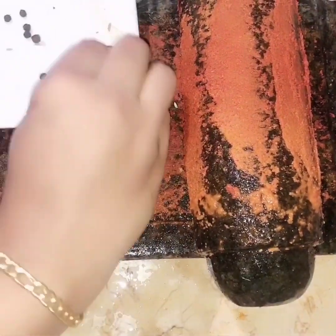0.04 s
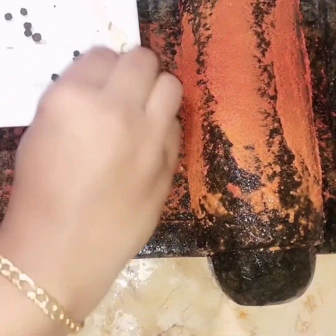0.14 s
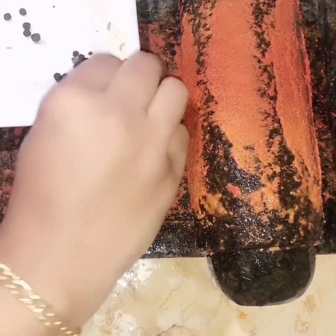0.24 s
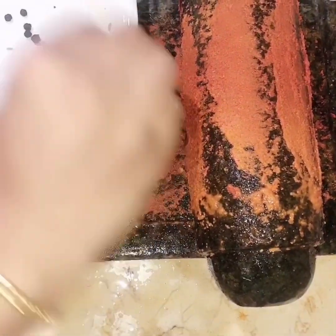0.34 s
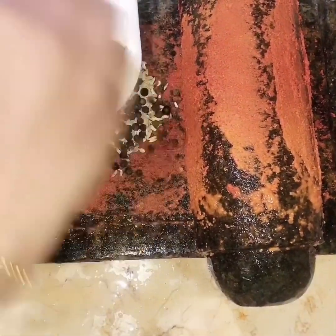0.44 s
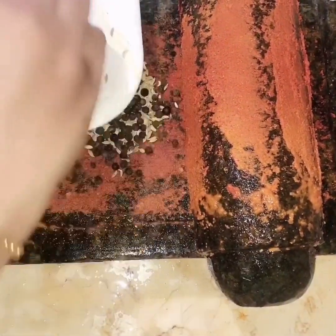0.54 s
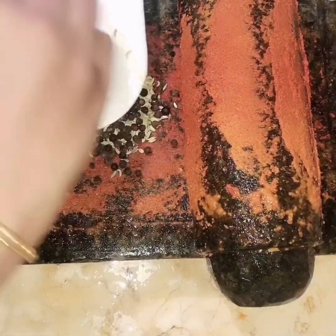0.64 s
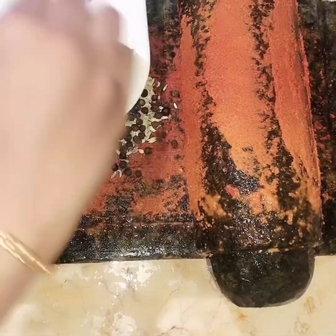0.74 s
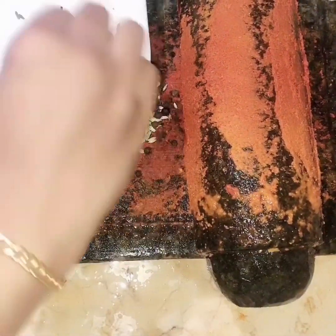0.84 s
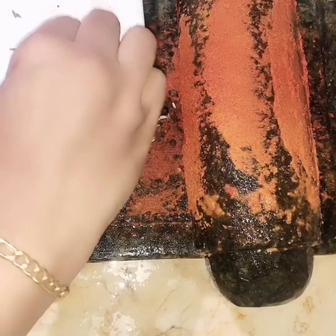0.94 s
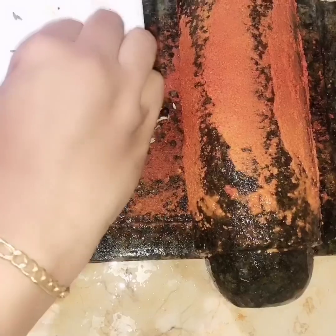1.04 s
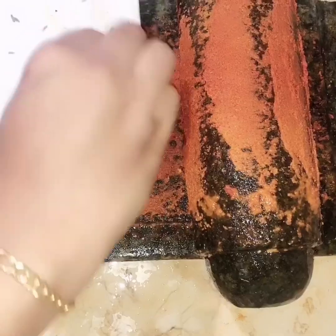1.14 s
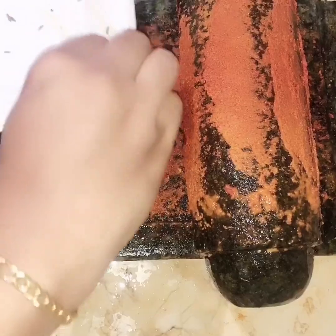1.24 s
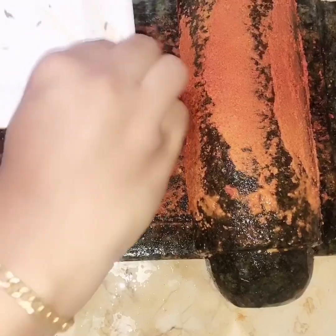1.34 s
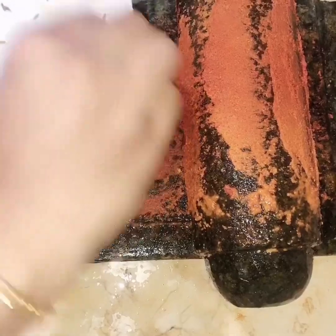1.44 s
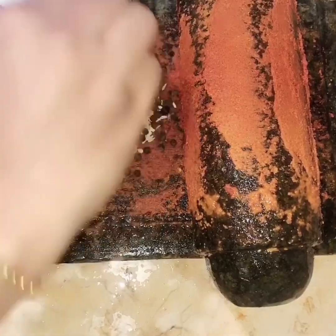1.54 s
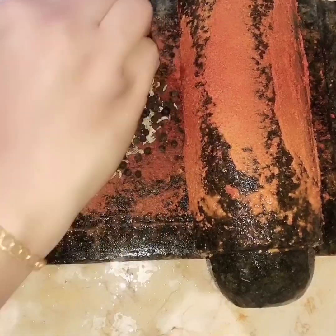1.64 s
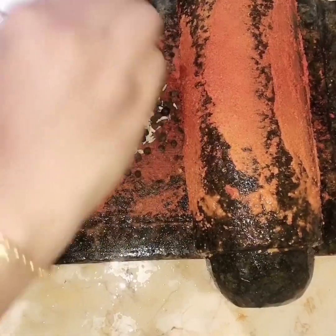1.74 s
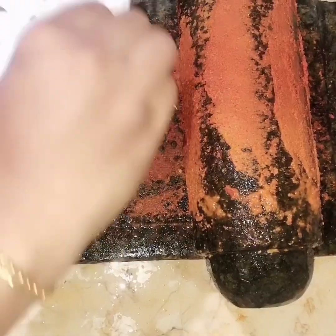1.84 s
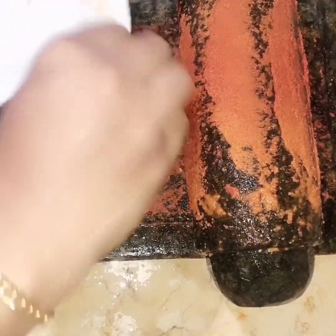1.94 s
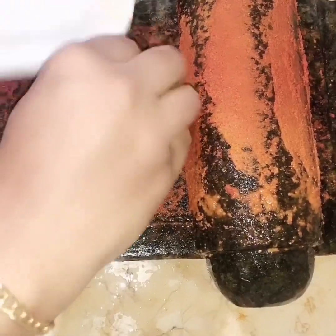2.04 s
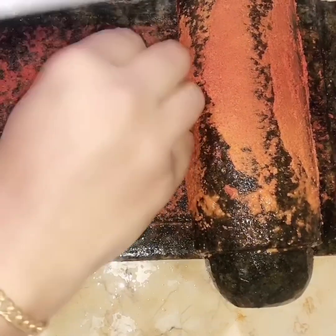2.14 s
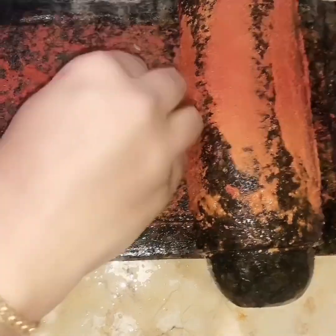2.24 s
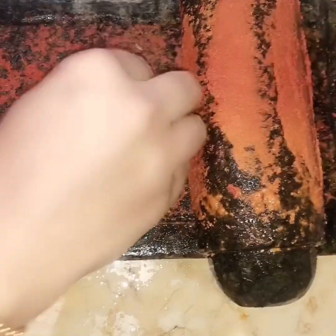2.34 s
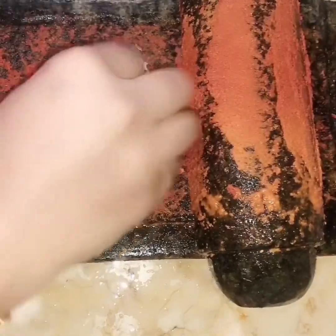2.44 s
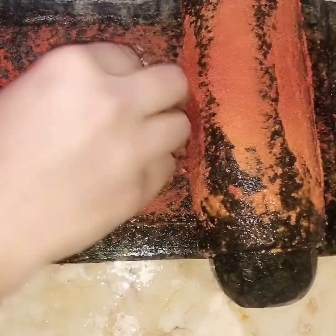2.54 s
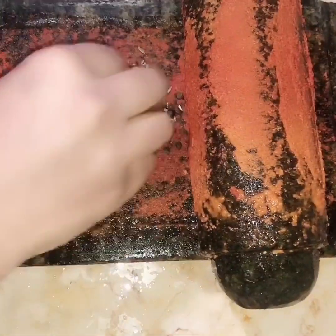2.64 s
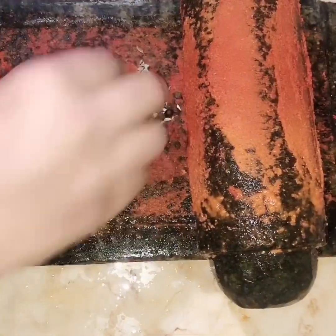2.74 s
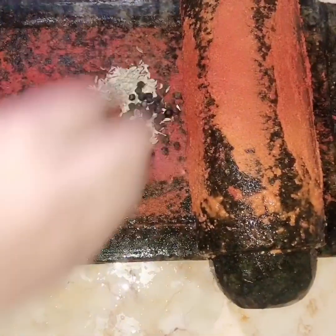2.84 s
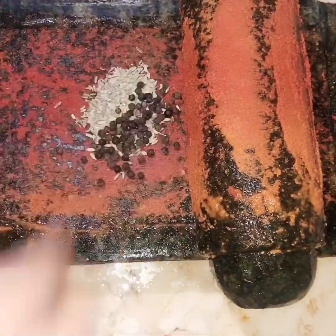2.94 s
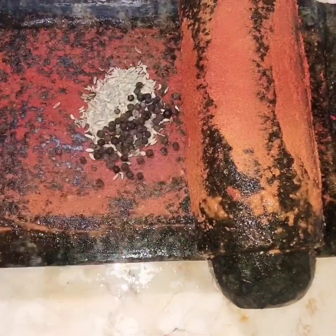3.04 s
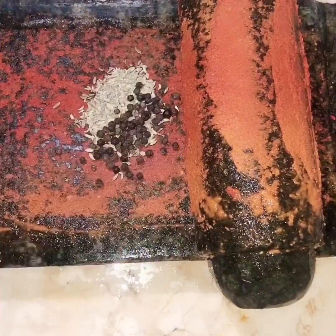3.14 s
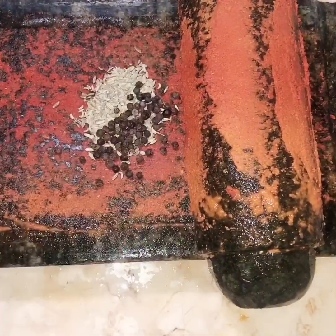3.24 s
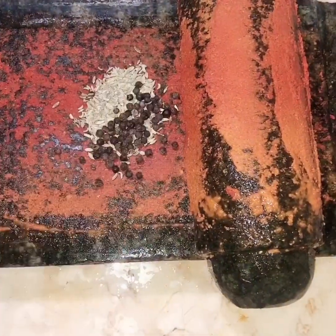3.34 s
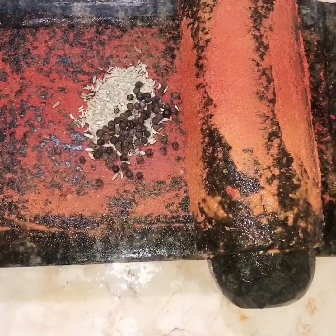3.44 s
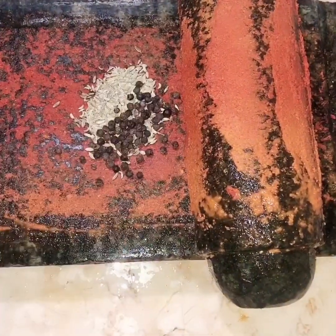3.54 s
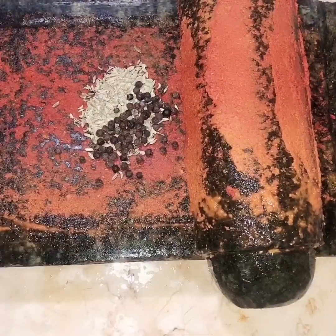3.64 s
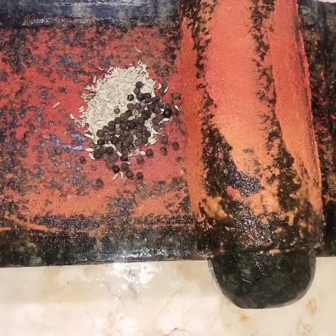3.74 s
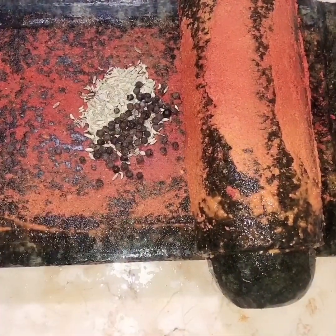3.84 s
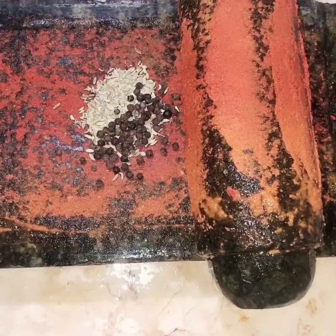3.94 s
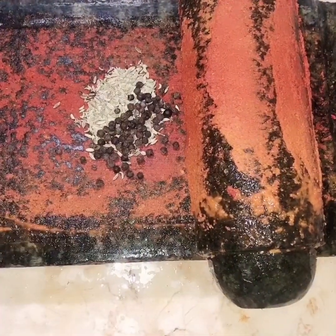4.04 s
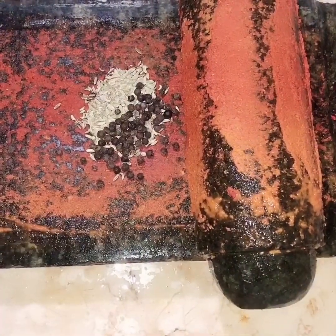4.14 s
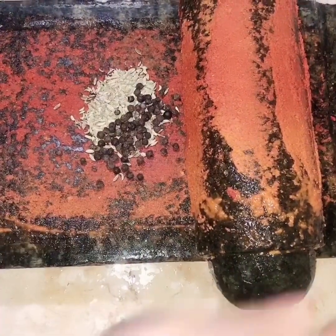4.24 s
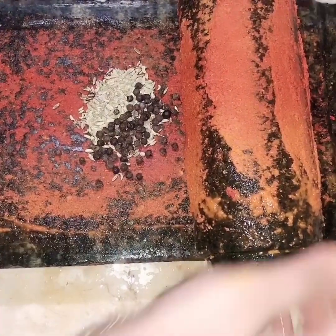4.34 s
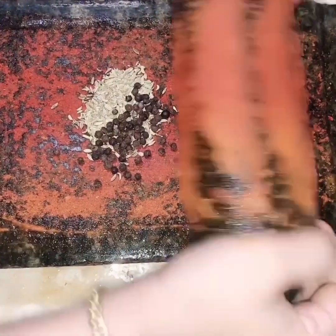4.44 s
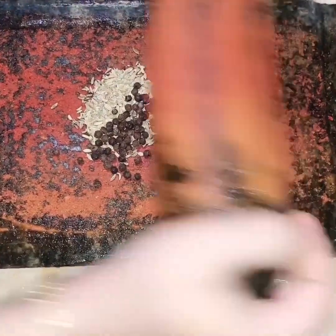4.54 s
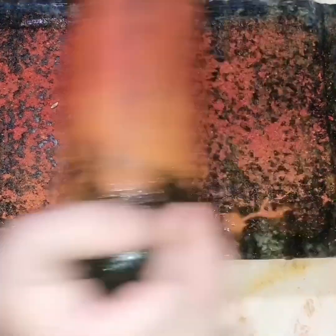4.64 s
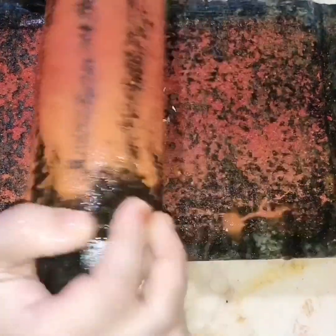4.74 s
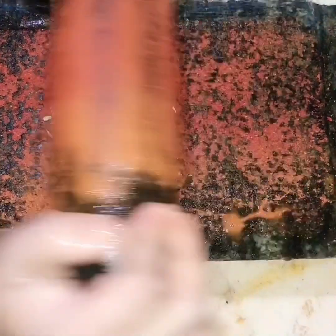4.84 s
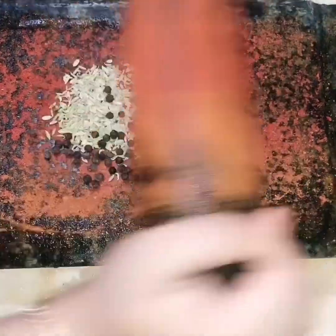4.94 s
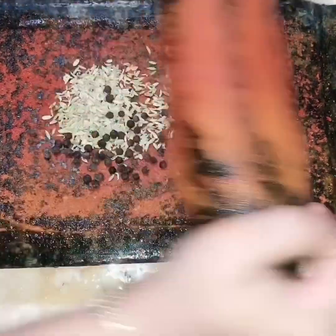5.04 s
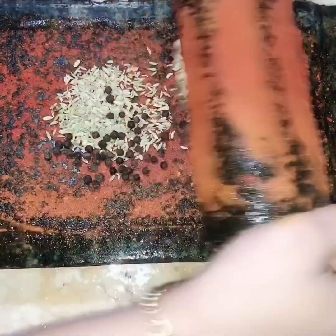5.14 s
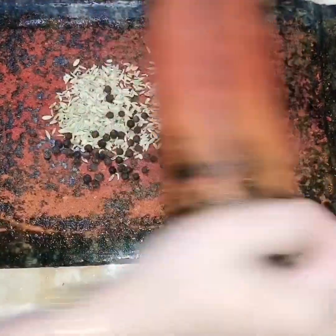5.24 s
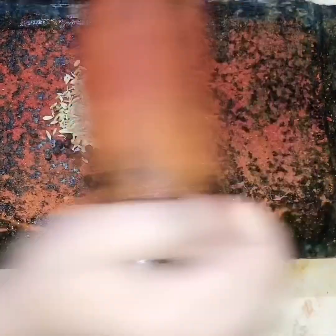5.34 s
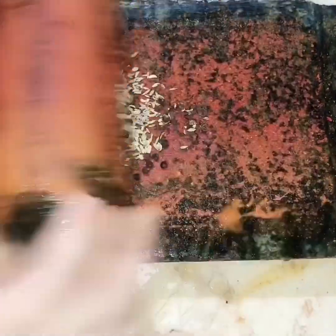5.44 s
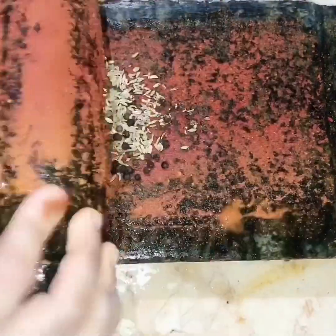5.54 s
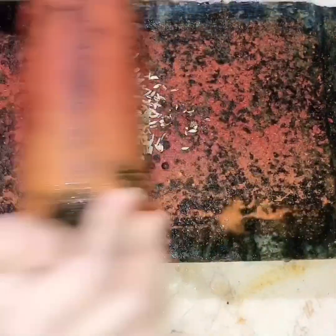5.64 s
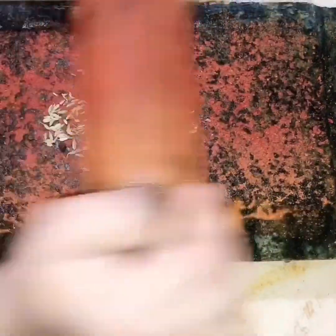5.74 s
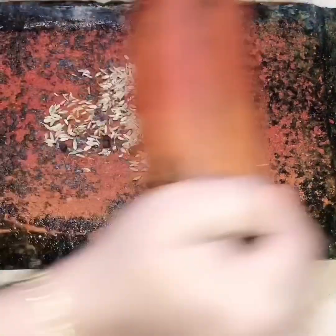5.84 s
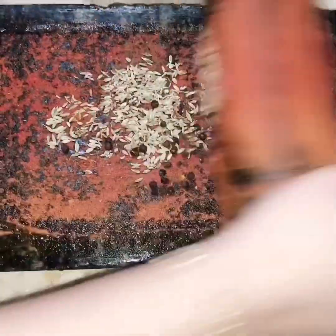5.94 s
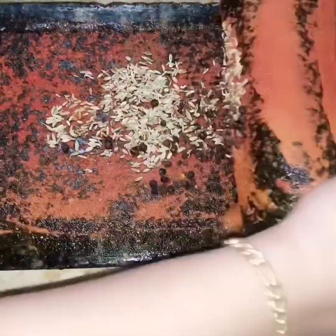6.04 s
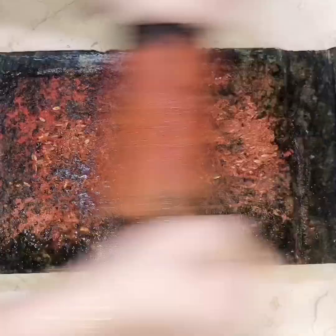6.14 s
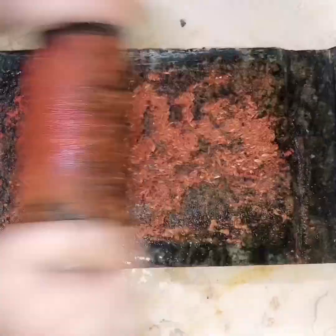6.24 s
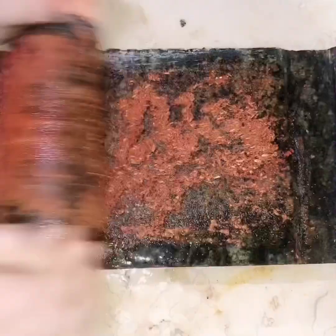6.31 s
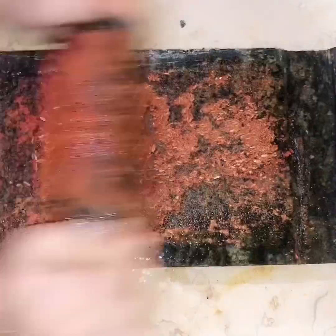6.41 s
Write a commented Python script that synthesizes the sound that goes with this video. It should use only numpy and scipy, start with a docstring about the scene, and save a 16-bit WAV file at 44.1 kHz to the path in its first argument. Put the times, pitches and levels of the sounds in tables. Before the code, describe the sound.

After a faint trickle of seeds and a ringing plate, a heavy stone roller scrapes, thumps and cracks spices in a small kitchen.

```python
"""In a small kitchen, peppercorns and fennel seeds are brushed off a plate onto a flat grinding stone.
The plate is put down, rings and rattles to rest. Then a stone roller is pushed to and fro: it grates,
knocks on the slab, thumps the counter and cracks the seeds, while a bracelet jingles faintly.
Blows are made of fading tones and noise; trickling and grinding are made of many tiny clicks.
A low rush lies under it all, and the sound drops out for a moment near the end."""
import sys
import numpy as np
from scipy import signal
from scipy.fft import rfft, irfft
from scipy.io import wavfile
from scipy.ndimage import uniform_filter1d, minimum_filter1d

SR = 44100
rng = np.random.default_rng(int(sys.argv[2]) if len(sys.argv) > 2 else 0)


def wav_record(signal):
    """Record a signal, one row per channel, as 16-bit PCM in the file named by sys.argv[1]."""
    frames = np.transpose(np.atleast_2d(signal))
    bounded = np.clip(frames, -1, 1)
    # unit amplitude maps onto the largest positive 16-bit level
    quanta = np.round(bounded * 32767).astype(np.int16)
    wavfile.write(sys.argv[1], SR, quanta)


N = 285629
TIME = np.arange(N) / SR
SHORT = TIME[:SR // 2]  # half a second, for one blow or echo

# Levels in the tables are relative. A fade_s is the time to fall by 60 dB.
# The tone of the background rush: pitch_hz, level_db
AIR_COLOUR = [(25, -8.5), (50, -5), (90, 2.3), (130, 1), (180, -4), (230, -9), (450, -17.5), (700, -15.5),
              (1100, -20.5), (2000, -25.5), (3000, -32), (4200, -41.5), (10000, -48.5), (14000, -60)]
# How long the room echoes: pitch_hz, fade_s
ROOM_FADES = [(100, 0.57), (500, 0.43), (1500, 0.43), (4000, 0.5), (9000, 0.43), (15000, 0.34)]
# Shelves and steel utensils that ring along: pitch_hz, level_db, fade_s
UTENSIL_TONES = [(300.2, 0, 0.7), (412, 2, 0.57), (478, -1.5, 0.3), (524, 4, .45), (947, 2, 0.3),
                 (920, -5.5, .35), (1100, -10, .35), (1662, -6, .4), (1950, -18.5, 0.26),
                 (2530, -0.5, 0.26), (2660, -1.5, 0.5), (2700, -3, .4), (3540, 0, .45)]
# The bracelet shakes: start_s, level_db
JINGLES = [(3.93, -50), (3.97, -46), (4.00, -58), (4.15, -50), (4.19, -64), (4.30, -44), (4.40, -64.5),
           (4.51, -41), (5.89, -35), (6.17, -37)]
# The ring of its links: pitch_hz, level_db, fade_s
LINK_TONES = [(6170, -6, 0.1), (9160, 4.5, .07), (12600, 1.5, .09)]

# Fingers sweep seeds off the plate: start_s, length_s, level_db
SWEEPS = [(0.0, 0.026, -51), (0.093, 0.089, -57), (.21, 0.067, -61), (.48, 0.19, -55.5),
          (0.693, 0.051, -50.5), (0.847, 0.21, -50.5), (1.065, 0.087, -64), (1.477, 0.0095, -49),
          (1.593, 0.044, -62), (2.206, .19, -64), (2.394, 0.21, -59), (2.68, 0.18, -69)]
# The tone of trickling seeds and of the scraping plate: pitch_hz, level_db
TRICKLE_COLOUR = [(1850, -5), (2030, 14.5), (2300, -21), (2680, 9), (2950, -5), (3300, 8.5), (3700, -3.5),
                  (5200, 2.5), (7000, -0.5), (10000, -4.5), (12500, -13), (14500, -32)]
SCRAPE_COLOUR = [(1900, -6), (2400, -13), (2700, 0), (3020, 5.5), (3500, -13), (3820, -3), (4300, -15),
                 (5000, -3), (6600, -24), (7400, -18), (10500, -33)]
# The plate creaks and ticks: start_s, level_db, pitch_hz, fade_s
CREAKS = [(.905, -45, 2000, 0.12), (.955, -34, 2010, 0.068), (.981, -29.5, 1990, 0.066),
          (1.023, -30.5, 2000, 0.039), (3.889, -31.5, 2790, 0.017)]
# The tone of a creak around its pitch: pitch_ratio, level_db
CREAK_SHAPE = [(.85, -15), (1, 9.5), (1.12, -11), (1.26, -7), (1.5, -20), (4, -20)]
# The plate lands, then rocks on its rim: start_s, level_db, treble_db, bass_db
LANDING_HITS = [(3.093, -6, -20.5, -32), (3.097, -9.5, -33.5, -7), (3.103, -20.5, -39, -30),
                (3.262, -3, -10, -20), (3.271, -7, -32, -13), (3.281, -5, -10, -10),
                (3.304, -7.5, -19.5, -3.5), (3.346, -8.5, -11.5, -27)]
ROCKING_HITS = [(3.542, -13.5, -11.5, -22.5), (3.567, -15.5, -12.5, -32), (3.591, -18, -29, -8.5),
                (3.608, -17, -27, -24), (3.676, -21, -36, -8.5), (3.687, -27.5, -36, -7),
                (3.748, -32.5, -15, 2.5), (3.773, -29.5, -33, -7), (3.94, -31.5, -34, -4.5)]
# The ring of the plate alone, then touching the counter: pitch_hz, level_db, fade_s
PLATE_TONES = [(800, -11.5, .06), (917, 1, 0.18), (1260, -6, 0.17), (1430, -8, 0.53), (1556, 5, 0.084),
               (1650, -21, 0.18), (1730, -10, .15), (1930, 1, 0.055), (1957, -2, 0.23), (2180, -1, 0.057),
               (2580, -13.5, 0.29), (2840, -25, 0.17), (3380, -18, 0.11), (5000, -22.5, 0.24)]
ROCKING_TONES = [(159.3, -8, 0.38), (803, -12, 0.088), (1280, 1.5, 0.092), (1355.5, 4.5, 0.11),
                 (1455, 2.5, 0.044), (1690, -18, .07), (2050, 5.5, 0.034), (2650, -2.5, 0.033),
                 (2970, -10, 0.055)]
# The tone of the crack when the plate hits: pitch_hz, level_db
PLATE_COLOUR = [(71, -55), (120, -22.5), (234, -10.5), (310, -4.5), (580, -16.5), (905, -5), (1040, -13),
                (1950, -9), (2290, -23), (2540, -14), (3950, -17), (7100, -21.5), (11100, -30),
                (15000, -57.5)]

# Seeds snap or drop on the stone: start_s, level_db
SNAPS = [(0.1616, -42), (0.728, -41), (1.0216, -45), (1.48, -41), (1.93, -58), (4.5332, -30),
         (4.7317, -24.5), (4.7985, -29.5), (4.8573, -20.5), (5.168, -34.5), (5.2138, -40), (5.284, -30),
         (5.5407, -26.5), (5.5566, -25.5), (5.6147, -22.5), (5.8638, -33.5)]
# The tone of a snap: pitch_hz, level_db
SNAP_COLOUR = [(1500, -22), (3500, -7), (6000, 3), (8500, 7.5), (11000, 5.5), (13500, -8), (16000, -17)]
# The slab tips as the weight shifts: start_s, level_db
THUMPS = [(4.535, -27), (4.74, -21), (4.895, -13.5), (5.324, -21.5), (5.367, -14.5), (5.538, -19),
          (5.558, -10.5), (5.959, -23.5), (6.242, -16)]
# The low ring of the counter: pitch_hz, level_db, fade_s
COUNTER_TONES = [(54.3, -9, 0.45), (77, 0, 0.15), (111.2, 2, 0.14), (133, -10.5, 0.11), (161.5, -4, 0.13),
                 (320, -2.5, .04)]
# Pushes and pulls of the roller: start_s, length_s, rumble_db, grate_db, crunch_db
STROKES = [(4.309, .16, -33, -29, -62.5), (4.497, .07, -30, -39, -57), (4.687, 0.047, -29, -23.5, -45.5),
           (4.785, 0.12, -21, -30, -48), (5.043, 0.17, -20, -48, -49.5), (5.334, 0.24, -28.5, -37, -51.5),
           (5.508, 0.052, -20, -34.5, -40), (5.606, 0.093, -19.5, -38.5, -47.5),
           (5.71, 0.18, -28.5, -45, -56), (5.929, .045, -31.5, -45, -43.5), (6.097, .07, -32.5, -50, -51.5),
           (6.204, 0.12, -21.5, -37.5, -39), (6.346, 0.11, -45, -20, -59)]
# The tone of the rolling weight, bare stone, crushed husks and grit: pitch_hz, level_db
RUMBLE_COLOUR = [(28, -32.5), (48, 3), (75, -5.5), (115, 1.5), (165, -4), (220, -14.5), (290, -14.5),
                 (400, -25.5)]
GRATE_COLOUR = [(150, -1.5), (210, 0), (300, 6), (420, -1), (560, -4.5), (700, 2.5), (950, -11.5),
                (1180, -4), (1500, -13), (2000, -28), (2800, -33)]
CRUNCH_COLOUR = [(1200, -2), (2100, -5), (3000, -10), (4200, -13), (6000, -11), (9000, -9.5),
                 (12000, -14.5), (14500, -35)]
GRIT_COLOUR = [(900, -3), (1500, 0), (2200, -2.5), (3200, -15.5), (4200, -26), (8000, -34)]
# The roller knocks on the slab: start_s, level_db, hardness_db, pitch_ratio
KNOCKS = [(4.317, -16.5, -39, 1.04), (4.337, -20, -32, 1.05), (4.457, -22.5, -32, 0.92),
          (4.523, -28, -16, 1.09), (4.558, -27.5, -37, 1.02), (4.703, -17, -34, 0.98),
          (4.743, -14, -28, 1.02), (4.811, 0.5, -9, 1.01), (5.088, -2.5, -16.5, 1.02),
          (5.153, -6, -55, 1.04), (5.160, -8, -15.5, 1.04), (5.351, 2.5, -1.5, 1.012),
          (5.518, -17.5, -12.5, 1.0), (5.696, 0.5, -11.5, 1.013), (5.829, -1, -13, 0.98),
          (6.342, -6, -13.5, 1.02), (6.381, -9.5, -15, 1.02), (6.413, -8.5, -13.5, 1.05)]
# The ring of roller and slab: pitch_hz, level_db, fade_s
STONE_TONES = [(309, -17.5, 0.033), (476, -20, 0.042), (681.6, -15, 0.049), (858, -13.5, 0.017),
               (1086, -7.5, 0.027), (1228, 1, 0.019), (1275, -3, 0.014), (1480, -12.5, 0.029),
               (1747, -17, 0.02), (1935, -8.5, 0.018), (2270, -13, 0.005), (2543, -19, 0.025),
               (2975, -8.5, 0.0084)]


def gain(db):
    """Turn decibels into a number to multiply by."""
    return 10 ** (np.asarray(db) / 20)


def unit_power(x):
    """Scale a sound so its average power is 1."""
    return x / np.sqrt(np.mean(x ** 2))


def unit_peak(x):
    """Scale a sound so its biggest swing is 1."""
    return x / np.max(np.abs(x))


def add(track, start_s, sound):
    """Mix a sound into a track."""
    i = max(int(start_s * SR), 0)
    track[i:i + len(sound)] += sound[:N - i]


def keep_side(x, hz, side, order=3):
    """Keep the "low" or "high" side of a pitch."""
    return signal.sosfilt(signal.butter(order, hz, side, fs=SR, output="sos"), x)


def colour(x, points):
    """Shape the tone along (pitch_hz, level_db) points, falling away past both ends."""
    hz, db = np.transpose(points)
    octave = np.log2(np.maximum(np.fft.rfftfreq(8192, 1 / SR), 1))
    outside = np.abs(octave - np.clip(octave, np.log2(hz[0]), np.log2(hz[-1])))
    curve_db = np.interp(octave, np.log2(hz), db) - 24 * np.minimum(outside, 2)
    # fold the filter so it rings only after a sound, never before
    folded = irfft(np.log(gain(curve_db)))
    folded[1:len(folded) // 2] *= 2
    folded[len(folded) // 2 + 1:] = 0
    return signal.fftconvolve(x, irfft(np.exp(rfft(folded))))[:len(x)]


def fade(fade_s):
    """A curve that falls by 60 dB in fade_s."""
    return np.exp(-np.log(1000) * SHORT / fade_s)


def burst(fade_s):
    """A puff of noise that dies away."""
    return rng.standard_normal(len(SHORT)) * fade(fade_s)


def ring(tones, scatter_db):
    """Fading tones of a struck object; their levels vary by chance, and neighbours swing opposite ways."""
    sizes = gain(scatter_db * rng.standard_normal(len(tones))) * (-1) ** np.arange(len(tones))
    return sum(size * gain(db) * fade(fade_s) * np.sin(2 * np.pi * hz * SHORT)
               for size, (hz, db, fade_s) in zip(sizes, tones))


def waver(per_s, depth_db):
    """A gain that drifts smoothly up and down by chance."""
    hold = int(SR / per_s)
    steps = np.repeat(rng.standard_normal(N // hold + 1), hold)
    smooth = uniform_filter1d(uniform_filter1d(steps, hold), hold)[:N]
    return gain(depth_db * unit_power(smooth))


def clicks(per_s, spread_db):
    """Tiny contacts at random moments; a spread above 0 makes some louder, below 0 softer."""
    size = gain(spread_db * np.minimum(rng.exponential(size=N), 4))
    return unit_power((rng.random(N) < per_s / SR) * size * rng.choice([-1, 1], N))


def gesture(start_s, length_s, db, rise_s, fade_s, sag_db_per_s=0):
    """The loudness of one hand movement: it swells, holds or eases off, then dies away."""
    age = np.maximum(TIME - start_s, 0)
    swell = np.sin(np.pi / 2 * np.minimum(age / rise_s, 1))
    release = np.exp(-np.log(1000) * np.clip((age - length_s) / fade_s, 0, 10))
    return swell * release * gain(db - sag_db_per_s * np.minimum(age, length_s))


def room_tone():
    """A steady low rush, like a fan, that wavers a little."""
    return unit_power(colour(rng.standard_normal(N), AIR_COLOUR)) * waver(per_s=8.2, depth_db=0.56)


def kitchen(x, wash_db, echo_s, echo_db):
    """Add one bounce off a hard wall, a wash of echoes longest in the bass, and ringing utensils."""
    hz, fades = np.transpose(ROOM_FADES)
    octave = np.log2(np.maximum(np.fft.rfftfreq(len(SHORT), 1 / SR), 1))
    noise = rfft(rng.standard_normal(len(SHORT)))
    wash = sum(irfft(noise * np.interp(octave, np.log2(hz), band)) * fade(fade_s)
               for band, fade_s in zip(np.eye(len(hz)), fades))
    utensils = gain(-63) * ring(UTENSIL_TONES, scatter_db=4)
    build_up = 1 - np.exp(-(SHORT / .007) ** 2)  # echoes gather over about 7 ms
    response = build_up * (gain(wash_db) * wash / np.linalg.norm(wash) + utensils)
    response[int(echo_s * SR)] += gain(echo_db)
    return x + signal.fftconvolve(x, response)[:N]


def bracelet():
    """Four small links brush each other in each jingle, each at a slightly different pitch."""
    out = np.zeros(N)
    for start_s, db in JINGLES:
        for delay, detune in rng.random((4, 2)):
            pitch = 1 + 0.11 * (detune - .5)
            tones = [(hz * pitch, tone_db, fade_s) for hz, tone_db, fade_s in LINK_TONES]
            add(out, start_s + 0.035 * delay, gain(db) * unit_peak(ring(tones, scatter_db=2)))
    return out


def seed_trickle():
    """Seeds tick across the plate in an uneven stream with each sweep of the fingers."""
    flow = sum(gesture(start_s, length_s, db, rise_s=0.32 * length_s, fade_s=0.16)
               for start_s, length_s, db in SWEEPS)
    flow *= waver(per_s=45, depth_db=2)
    return unit_power(colour(clicks(per_s=1800, spread_db=-0.5), TRICKLE_COLOUR)) * flow


def plate_scrape():
    """The plate scrapes briefly as it is taken away."""
    rasp = unit_power(colour(clicks(per_s=2500, spread_db=-1), SCRAPE_COLOUR))
    return rasp * gesture(start_s=2.066, length_s=.072, db=-43.5, rise_s=0.0092, fade_s=0.11)


def plate_creaks():
    """The plate creaks and ticks: short rasps, each gathered around one pitch."""
    out = np.zeros(N)
    for start_s, db, hz, fade_s in CREAKS:
        shape = [(hz * ratio, level_db) for ratio, level_db in CREAK_SHAPE]
        add(out, start_s, gain(db) * unit_peak(colour(burst(fade_s), shape)))
    return out


def plate_hits(hits, tones, crack_fade_s, ring_db):
    """The plate hits the counter: each blow is a short crack plus the ring of the plate."""
    out = np.zeros(N)
    for start_s, db, treble_db, bass_db in hits:
        crack = colour(burst(crack_fade_s), PLATE_COLOUR)
        middle = unit_peak(keep_side(keep_side(crack, 1020, "high"), 2530, "low"))
        ringing = gain(ring_db) * unit_peak(ring(tones, scatter_db=3.5))
        treble = gain(treble_db) * unit_peak(keep_side(crack, 3660, "high"))
        bass = gain(bass_db) * unit_peak(keep_side(crack, 790, "low"))
        add(out, start_s, gain(db) * (unit_peak(middle + ringing) + treble + bass))
    return out


def seed_snaps():
    """A brittle seed breaks or drops on the stone with a short, bright burst."""
    out = np.zeros(N)
    for start_s, db in SNAPS:
        add(out, start_s, gain(db) * unit_peak(colour(burst(fade_s=0.031), SNAP_COLOUR)))
    return out


def counter_thumps(settle_s, settle_db):
    """The slab rocks under the roller, settles just after each knock, and shakes the counter."""
    out = np.zeros(N)
    settles = [(start_s + settle_s, db + settle_db) for start_s, db, _, _ in KNOCKS]
    for start_s, db in list(THUMPS) + settles:
        boom = keep_side(ring(COUNTER_TONES, scatter_db=0), 450, "low")
        add(out, start_s, gain(db) * unit_peak(keep_side(boom, 44, "high", order=2)))
    return out


def roller_strokes():
    """With each stroke the rough roller rumbles, grates on the slab in little jerks and crushes husks."""
    effort = np.zeros((3, N))
    for start_s, length_s, *levels_db in STROKES:
        push = gesture(start_s, length_s, db=0, rise_s=.025, fade_s=.25, sag_db_per_s=8.5)
        effort += np.outer(gain(levels_db), push)
    weight, sliding, crushing = effort
    rumble = unit_power(colour(clicks(per_s=560, spread_db=1), RUMBLE_COLOUR)) * weight
    grate = unit_power(colour(clicks(per_s=300, spread_db=0), GRATE_COLOUR)) * sliding
    husks = colour(clicks(per_s=1700, spread_db=2), CRUNCH_COLOUR)
    crunch = unit_power(husks * waver(per_s=90, depth_db=3)) * crushing
    return gain(-2) * rumble + gain(-1.5) * grate + gain(2.5) * crunch


def roller_knocks(travel_s, lead_s, contact_s, chatter_db, grit_db):
    """Stone hits stone, cushioned by seeds; high tones cross the slab faster, so knocks chirp down."""
    out = np.zeros(N)
    hz = np.fft.rfftfreq(len(SHORT), 1 / SR)
    chirp = np.exp(-4j * np.pi * travel_s * np.sqrt(1000 * hz))  # travel_s is the delay at 1000 Hz
    cushion = 1 - np.exp(-(SHORT / contact_s) ** 2)
    for start_s, db, hardness_db, pitch in KNOCKS:
        # the pitted faces touch at many points, so each knock has its own tone
        chatter = burst(fade_s=0.022)
        contact = 1 + gain(chatter_db) * rfft(chatter / np.linalg.norm(chatter))
        tones = [(tone_hz * pitch, tone_db, fade_s) for tone_hz, tone_db, fade_s in STONE_TONES]
        body = irfft(rfft(ring(tones, scatter_db=2) * cushion) * contact * chirp)
        dull = keep_side(keep_side(body, 1220, "low", order=5), 380, "high", order=1)
        top_hz = 2900 * gain(0.37 * hardness_db)  # a harder knock reaches higher
        sharp = keep_side(keep_side(body, 1780, "high", order=4), top_hz, "low")
        knock = unit_peak(dull) + gain(hardness_db) * unit_peak(sharp)
        add(out, start_s - lead_s, gain(db) * knock)
        # grit crushed between the faces rasps for a moment
        grit = colour(burst(fade_s=0.17), GRIT_COLOUR)
        add(out, start_s, gain(db + hardness_db + grit_db) * unit_peak(grit))
    return out


def scene():
    """Mix everything into one channel; the plate gets more room echo than the nearby stone."""
    landing = gain(-1) * plate_hits(LANDING_HITS, PLATE_TONES, crack_fade_s=0.034, ring_db=-8)
    rocking = gain(1.5) * plate_hits(ROCKING_HITS, ROCKING_TONES, crack_fade_s=0.06, ring_db=3.5)
    plate = kitchen(landing + rocking, wash_db=-3.5, echo_s=0.012, echo_db=-6.5)
    knocks = roller_knocks(travel_s=0.00238, lead_s=0.003147, contact_s=0.0012,
                           chatter_db=-7, grit_db=-9.5)
    stone = kitchen(gain(0.5) * knocks, wash_db=-7, echo_s=0.015, echo_db=-16.5)
    pouring = gain(1) * seed_trickle() + plate_scrape() + plate_creaks()
    grinding = gain(3) * seed_snaps() + roller_strokes()
    jingling = gain(-5.5) * bracelet()
    handwork = kitchen(pouring + grinding + jingling, wash_db=-6, echo_s=.006, echo_db=-10.5)
    thumps = gain(3) * counter_thumps(settle_s=0.01508, settle_db=-18.5)
    return (plate + stone + handwork + thumps + gain(-39) * room_tone())[None]


def record(dry):
    """Turn the loudest peaks down quickly, let the sound drop out once, and cut the highest treble."""
    ceiling, top_hz = .92, 15800
    gap_start_s, gap_end_s = 5.985, 6.122
    allowed = minimum_filter1d(ceiling / np.maximum(np.abs(dry), ceiling), size=81)
    limiter = uniform_filter1d(uniform_filter1d(allowed, size=41), size=41)
    sound_on = uniform_filter1d(1. * ((TIME < gap_start_s) | (TIME > gap_end_s)), size=64)
    treble_cut = signal.ellip(8, .2, 70, top_hz, fs=SR, output="sos")
    return signal.sosfilt(treble_cut, dry * limiter * sound_on)


dry = scene()
out = record(dry)
wav_record(out)
```